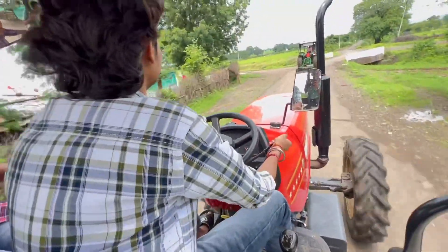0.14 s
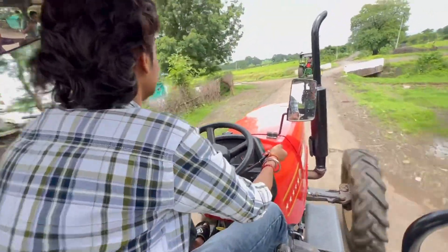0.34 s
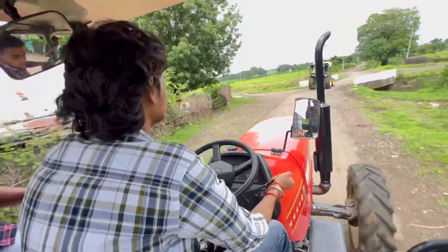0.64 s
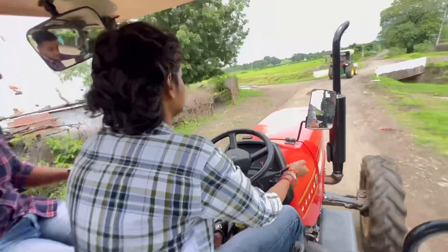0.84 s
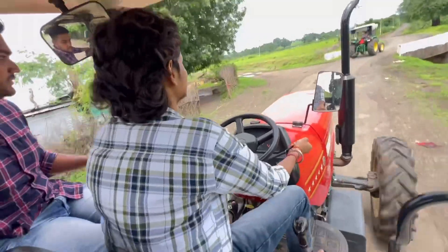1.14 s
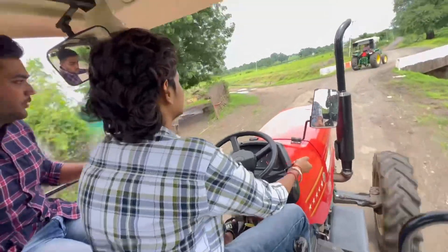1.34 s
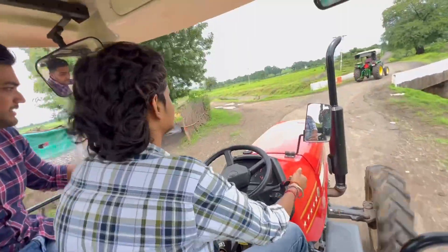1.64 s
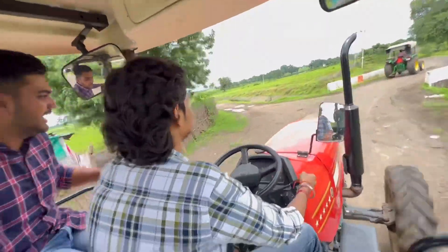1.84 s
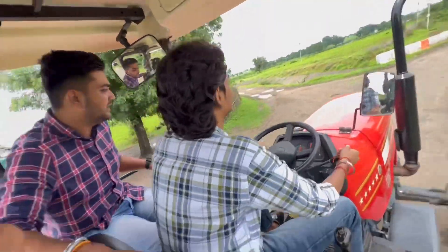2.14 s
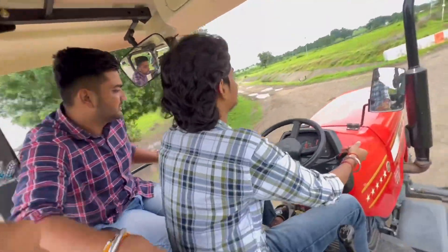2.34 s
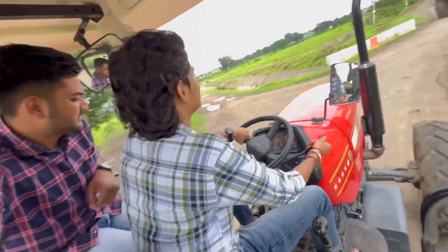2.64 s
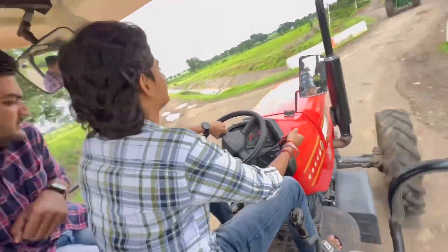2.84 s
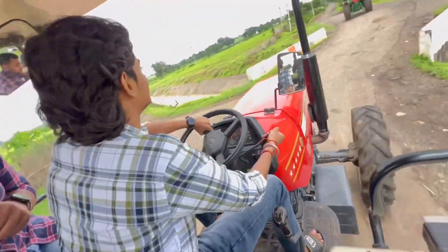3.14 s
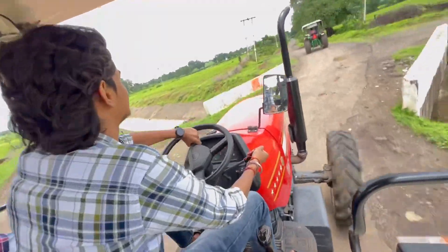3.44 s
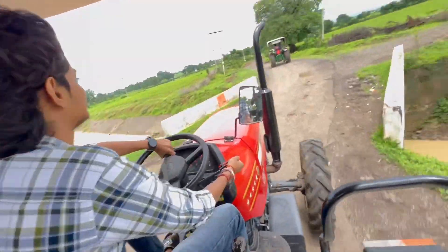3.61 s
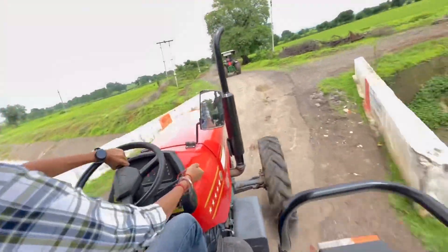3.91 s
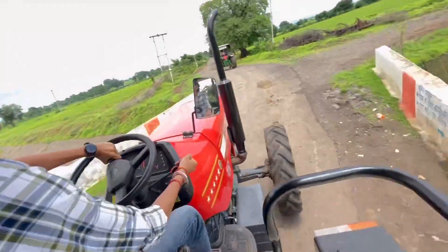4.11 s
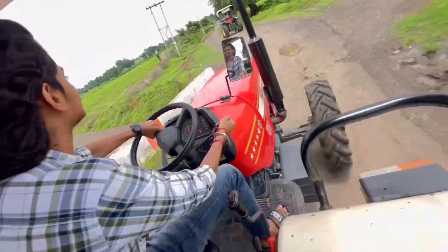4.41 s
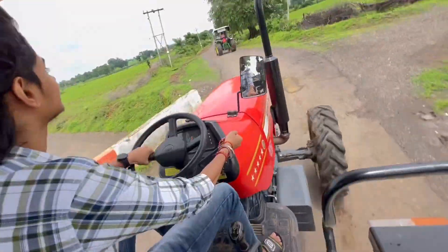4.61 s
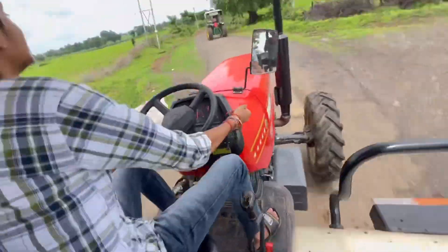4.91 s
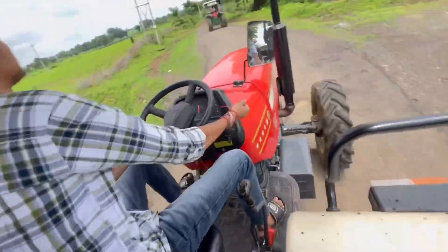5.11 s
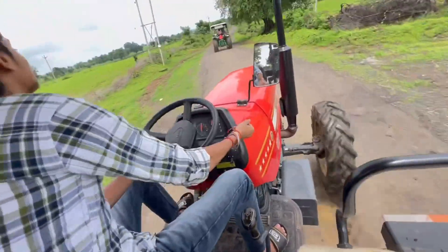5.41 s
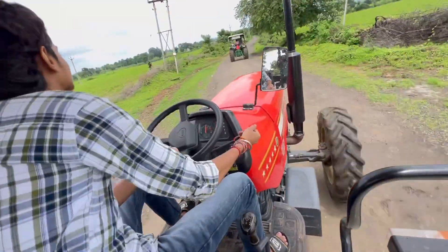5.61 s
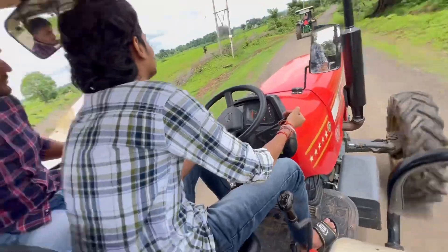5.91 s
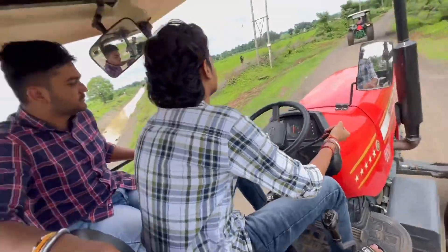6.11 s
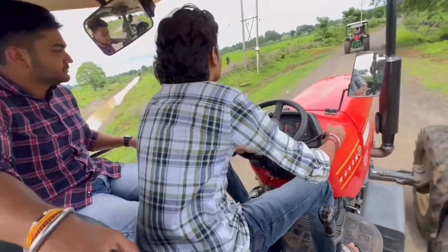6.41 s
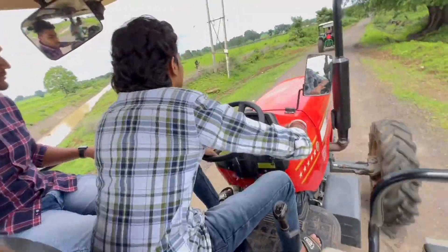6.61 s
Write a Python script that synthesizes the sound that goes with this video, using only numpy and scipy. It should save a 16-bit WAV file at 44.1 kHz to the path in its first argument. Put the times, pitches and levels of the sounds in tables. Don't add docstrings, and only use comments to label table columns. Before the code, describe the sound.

From the driver's platform of a moving tractor, a diesel engine clatters at nearly constant speed. It starts quieter, then a deep exhaust drone swells in within the first second and keeps surging and dropping. Bumps bring brief rattles and bright clinks, a faint pump whine comes and goes, and wind thumps the close stereo microphone outdoors.

```python
import sys
import numpy as np
from scipy import signal
from scipy.io import wavfile
from scipy.ndimage import uniform_filter1d

SR = 44100
rng = np.random.default_rng(int(sys.argv[2]) if len(sys.argv) > 2 else 0)


def volts(x):
    e = np.asarray(x, float) / 20
    return 10 ** e


def output_pcm(signal):
    pcm = np.clip(np.atleast_2d(signal).T, -1, 1) * 32767
    wavfile.write(sys.argv[1], SR, np.round(pcm).astype(np.int16))


N = 297675
TIME = np.arange(N) / SR

# (frequency [Hz], correlation [0-1])
PORT_LIKENESS = [(60, .8), (260, .65), (560, .15), (770, .45), (1050, .7), (1400, .3), (2500, .15),
                 (8800, .1), (9700, .985), (16000, .985)]
# (frequency [Hz], level difference [dB])
PORT_LEAN = [(60, 2.5), (200, 4.5), (700, 5), (1290, 3.2), (2380, .3), (3300, 3), (4000, 8), (5400, 8),
             (7200, 2), (9500, 0), (16000, 0)]
# (frequency [Hz], phase lead [rad])
PORT_LEAD = [(260, 0), (600, 3.1), (850, 5.3), (1500, 5.9), (1800, 9), (2500, 13.2), (9200, 11.3),
             (9750, 9.6), (10850, 9.25), (11250, 6.45), (12650, 6.1), (13250, 3.3), (14350, 3),
             (15150, .15), (16000, -.1)]

# (time [s], level [dB])
GUSTS = [(0, -44), (.4, -43), (.55, -38.5), (.88, -37), (1.18, -30.5), (1.55, -27.5), (1.85, -31),
         (2.1, -29), (2.38, -28), (2.48, -38.5), (3.05, -37.5), (3.53, -26.5), (3.7, -37), (4.8, -35.5),
         (5.4, -31), (5.95, -40), (6.55, -24.5), (6.75, -26.5)]
# (frequency [Hz], density [dB per Hz])
BUFFET_COLOUR = [(60, -25), (90, 2.5), (130, -2), (170, -3), (280, -4.5), (450, -6.5), (700, -14.5),
                 (1200, -62)]
# (frequency [Hz], density [dB per Hz])
THUD_COLOUR = [(22, -35), (33, -18), (42, 3), (60, 1.5), (95, 0), (130, 4.5), (200, -31)]

# (time [s], shaking level [dB])
SHAKING = [(0, -45), (.4, -45.5), (.75, -43.5), (1.3, -40.5), (2, -43), (2.6, -43), (3.3, -41),
           (3.9, -41.5), (4.23, -42), (4.4, -40), (4.68, -41), (5, -38.5), (5.64, -40), (5.86, -38),
           (6.15, -35), (6.75, -35)]
# (time [s], rattle rise [dB], dying time [s])
BUMPS = [(.69, 11, 0.065), (.85, 10, 0.12), (1.0, 8, .12), (1.3, -1.5, .08), (2.11, 8.5, 0.075),
         (2.35, 9, 0.16), (2.66, 7.5, 0.12), (2.91, 1, .05), (3.19, 5, 0.057), (3.4, 6.5, .08),
         (3.68, 8.5, 0.17), (4.29, 10, .04), (4.35, 3.5, .2), (4.74, 10, 0.17), (4.92, -2.5, 0.068),
         (5.16, 9.5, 0.11), (5.42, 5, .08), (5.75, 6.5, .1)]
# (time [s], peak level [dB], ring frequency [Hz])
CLINKS = [(0.6938, -33, 5680), (0.8984, -26, 6950), (0.9742, -32, 5334), (1.1494, -28, 4340),
          (2.1093, -30, 6050), (2.6296, -32, 5030), (3.6747, -31, 6150), (4.2856, -30, 4976),
          (4.7512, -32, 4510), (5.157, -33, 5920), (5.5351, -25, 5350), (5.62, -30, 4146),
          (5.7894, -30, 7460), (5.9386, -25, 7290), (6.09, -21.5, 8320), (6.2162, -21, 6330),
          (6.2921, -23, 6565)]
# (time [s], peak level [dB], ring frequency [Hz])
HARD_KNOCKS = [(0.694, -16, 1230), (0.825, -23, 1100), (1.186, -14.5, 910), (1.305, -16.5, 945),
               (1.487, -16.5, 910), (1.507, -24, 900), (2.285, -16.5, 866), (2.907, -17.5, 1046),
               (4.832, -24, 903), (5.016, -28, 890), (5.11, -18, 945), (5.19, -11.5, 1010),
               (5.365, -15, 1000), (5.41, -17, 1059), (5.47, -19, 950), (5.939, -20, 1015),
               (6.043, -31, 1006), (6.246, -12, 1040), (6.366, -11, 1062), (6.442, -11.5, 970),
               (6.465, -11, 1040), (6.614, -15, 980), (6.64, -11.5, 1036), (6.713, -12, 1058)]
# (frequency [Hz], density [dB per Hz])
RATTLE_COLOUR = [(6000, -5), (8500, -0.5), (9300, 0), (10300, 2), (12000, -11.5), (13800, -12),
                 (15300, -7.5), (17000, -4)]

# (frequency [Hz], level against knock [dB], wander [Hz])
GEAR_MESHES = [(543, -19.5, 3.4), (767, -16, 3.53), (910, -14, 3.45), (1080, -11.5, 10), (1222, -21, 7.96)]
# (start [s], length [s], pitch [Hz], glide [Hz per s], level [dB])
PUMP_WHINE = [
    (.75, .3, 2415, 150, -53),
    (1.3, .55, 2478, 0, -51),
    (1.85, .6, 2482, -25, -47),
    (1.45, 1.0, 4420, 0, -60),
    (3.2, .55, 2410, -30, -53),
]

# (time [s], firings per second [Hz])
FIRING_RATE = [(0.0, 40.7), (0.13, 41.1), (0.21, 39.67), (0.56, 39.2), (1.3, 39.9), (4.06, 40.16),
               (5.06, 39.25), (5.38, 39.88), (6.11, 39.85), (6.45, 40.83), (6.69, 40.7), (6.75, 39.9)]
# (time [s], level [dB])
LOAD = [(0, -40), (.4, -38), (.7, -33), (.9, -29.5), (1.4, -30), (2.1, -31.5), (2.5, -33.5), (2.75, -33),
        (3.1, -30.5), (3.55, -30), (4.23, -34), (4.4, -30.5), (4.68, -31.5), (5.17, -27.5), (5.47, -27),
        (5.64, -31), (6.17, -30), (6.26, -27)]
# (frequency [Hz], density [dB per Hz])
BLOCK_COLOUR = [(350, -15), (480, -11), (650, -10), (850, -4), (1100, -3.5), (1600, -5), (2000, -6.5),
                (2700, -13.5), (3400, -23), (4500, -46.5)]
# (frequency [Hz], width [Hz], level [dB])
PANELS = [(530, 9.6, 5), (741, 19, 1.5), (910, 22, -4), (980, 64, -2), (1063, 67, -4.5), (1244, 86, -5.5),
          (1484, 190, -9.5), (2580, 310, -6)]
# (frequency [Hz], density [dB per Hz])
HISS_COLOUR = [(1800, 0), (2800, 4.5), (3600, 1.5), (5000, -3), (6500, -0.5), (8500, -5.5), (9700, -16.5),
               (11000, -43)]

# (time [s], drone level [dB], third order over second [dB])
BOOM = [(0, -54, 6), (.46, -51, 3), (.72, -25, 2), (1.45, -22, -3), (1.86, -26.5, -3.5), (2.06, -35, 2),
        (2.14, -24.5, -1), (2.42, -25, -2), (2.48, -38, -2.5), (3.25, -22.5, -2), (3.46, -26.5, -2),
        (3.65, -38, 2), (4.0, -40, -5), (4.75, -33, -0.5), (5.15, -21.5, 5.5), (5.62, -35.5, -0.5),
        (6.3, -18, -2), (6.75, -26.5, 5)]
# (time [s], change [dB], half length [s])
DRONE_SURGES = [(1.2, -1.5, .03), (2.18, 2.5, 0.027), (2.33, -4, 0.023), (2.4, 4.5, .025), (3.3, -3, 0.027),
                (5.19, 4, .03), (2.56, -1.5, 0.063), (3.8, 9.5, .1), (4.36, 4.5, 0.058), (4.6, -1, .05),
                (5.25, -4.5, 0.035), (5.43, 2, 0.098), (5.97, 4.5, 0.11), (6.45, 1, 0.098)]
# (time [s], rise [dB], half length [s])
FLARES = [(.52, 22, 0.15), (.1, 10.5, 0.27), (1.26, 9, .06), (1.63, 11, 0.045), (1.74, 17, 0.087),
          (2.22, 14, .09), (3.36, 19.5, .05), (4.36, 19.5, .06), (5.06, 20, 0.041), (5.19, 12, .05),
          (5.88, 10, .05)]
# (time [s], rise [dB], half length [s])
GROWLS = [
    (1.28, 13, 0.085),
    (1.6, 9.5, 0.2),
    (2.05, 10.5, 0.35),
    (2.8, 6, 0.32),
    (3.2, 9, .15),
    (4.36, 12, .05),
    (5.1, 10, 0.11),
    (6.2, 12, .08),
    (6.4, 8, .1),
    (6.6, 7, .04),
]
# (multiple of firing rate, level against fifth [dB], phase [turns])
UPPER_ORDERS = [(1.001, -13, 0.11), (5, -2, 0.53), (6.42, -1.5, 0.3)]


def evened(x):
    return x / np.sqrt(np.mean(x ** 2) + 1e-20)


def read(points, hz):
    f, value = np.transpose(points)
    return np.interp(np.log(hz + 1), np.log(f + 1), value)


def curve(table, column=1):
    by_column = np.transpose(table)
    return np.interp(TIME, by_column[0], by_column[column])


def humps(events):
    return sum(db * np.exp(-((TIME - s) / half) ** 2) for s, db, half in events)


def drift(top_hz, count=24):
    hz = np.geomspace(top_hz / 12, top_hz, count)
    coarse = TIME[::64]
    cycles = hz[:, None] * coarse + rng.random((count, 1))
    waves = np.sin(2 * np.pi * cycles) / np.sqrt(hz)[:, None]
    return np.interp(TIME, coarse, evened(waves.sum(0)))


def field(colour, patchy_db, modes=(), modes_db=0, alike=1, size=2048):
    hop = size // 4
    frames, hz = N // hop + 5, np.fft.rfftfreq(size, 1 / SR)
    a, b, c, d, patches = rng.standard_normal((frames, len(hz), 5)).T
    patches = uniform_filter1d(patches, size=6, axis=0)
    patches = evened(uniform_filter1d(patches, size=8, axis=1))
    rings = 1 + sum(volts(2 * (db + modes_db)) / (1 + (2 * (hz - f) / w) ** 2) for f, w, db in modes)
    shape = volts(read(colour, hz)) * np.sqrt(rings)
    same = np.clip(alike * read(PORT_LIKENESS, hz), -1, 1)[:, None]
    left, unrelated = a + 1j * b, c + 1j * d
    delayed = left * np.exp(-1j * read(PORT_LEAD, hz))[:, None]
    right = same * delayed + np.sqrt(1 - same ** 2) * unrelated
    lean = volts(read(PORT_LEAN, hz) / 2)[:, None]
    z = np.array([left * lean, right / lean]) * shape[:, None] * volts(patchy_db * patches)
    pair = signal.istft(z, nperseg=size, noverlap=size - hop)[1][:, :N]
    return pair / np.sqrt(np.mean(pair.mean(0) ** 2))


def at_ports(hz, turns):
    lead, lean = read(PORT_LEAD, hz), volts(read(PORT_LEAN, hz) / 2)
    left = lean * np.sin(2 * np.pi * turns)
    right = np.sin(2 * np.pi * turns - lead) / lean
    return np.sqrt(2) * np.array([left, right])


def wind():
    gust_db, boom_db = curve(GUSTS), curve(BOOM)
    swell_db = boom_db - boom_db.mean() + gust_db - gust_db.mean()
    thud_db = -43 + 0.18 * swell_db + 1.4 * drift(9)
    buffet = field(BUFFET_COLOUR, patchy_db=1.47, alike=0.72)
    thud = field(THUD_COLOUR, patchy_db=2.5, alike=0.45, size=4096)
    return volts(gust_db + 1.5 + 0.67 * drift(25)) * buffet + volts(thud_db + 4.5) * thud


def gears():
    load_db, out = curve(LOAD), np.zeros((2, N))
    for hz, db, wander in GEAR_MESHES:
        turns = np.cumsum(hz + wander * drift(6)) / SR
        out += volts(load_db + db + 1.8 * drift(12)) * at_ports(hz, turns)
    return out


def steering_pump():
    out = np.zeros((2, N))
    for s, length, start_hz, glide, db in PUMP_WHINE:
        hz = start_hz + glide * np.clip(TIME - s, 0, length) + 4 * drift(5)
        sounding = uniform_filter1d(1. * (TIME > s) * (TIME < s + length), size=4000)
        out += volts(db + 0.99 * drift(6)) * sounding * at_ports(hz, np.cumsum(hz) / SR)
    return out


def blows(events, t60, level_db):
    t = np.arange(3000) / SR
    rings, envelope = np.zeros((2, N + len(t))), np.zeros(N + len(t))
    for s, db, hz in events:
        onset = np.minimum(t / 0.00064, 1)
        fade = volts(db + level_db - 60 * t / t60) * onset
        at = round(s * SR)
        rings[:, at:at + len(t)] += fade * at_ports(hz, hz * t)
        envelope[at:at + len(t)] += fade
    return rings[:, :N], envelope[:N]


def jolts():
    clinks, bright = blows(CLINKS, t60=0.053, level_db=-3.5)
    knocks, _ = blows(HARD_KNOCKS, t60=0.041, level_db=-4.5)
    burst = bright * field(RATTLE_COLOUR, patchy_db=1.5, alike=0.6, size=256)
    return 0.45 * clinks + knocks + 0.5 * burst


def bump_rise():
    rise_s = 0.027
    return sum(db * np.exp(np.minimum((TIME - s) / rise_s, (s - TIME) / dying)) for s, db, dying in BUMPS)


def firing_gate(turns, late, fade, steady, uneven_db):
    turns = turns - late + 1
    each_firing = volts(uneven_db * np.clip(rng.standard_normal(400), -2, 1.6))
    hardness = each_firing[turns.astype(int)]
    burst = uniform_filter1d(hardness * np.exp(-(turns % 1) / fade), size=90)
    return evened(steady + burst)


def loose_parts(turns):
    rattle_db = -60.5 + 1.93 * (curve(SHAKING) + 43.0) + bump_rise()
    puffs = firing_gate(turns, late=0.25, fade=0.4, steady=0.35, uneven_db=3.5)
    return volts(rattle_db + 9.0) * puffs * field(RATTLE_COLOUR, patchy_db=0.5, size=512)


def valves_and_fan(turns):
    hiss_db = curve(SHAKING) + 0.39 * bump_rise()
    pulses = firing_gate(turns, late=0.34, fade=0.51, steady=2.5, uneven_db=2.0)
    return volts(hiss_db + 0.5) * pulses * field(HISS_COLOUR, patchy_db=1.6, size=512)


def block_knock(turns):
    knock_db = curve(LOAD) + 0.11 * bump_rise() + 0.65 * drift(14)
    strokes = firing_gate(turns, late=0.5, fade=0.45, steady=1.5, uneven_db=2.5)
    ringing = field(BLOCK_COLOUR, patchy_db=2.2, modes=PANELS, modes_db=6, size=4096)
    return volts(knock_db + 0.5) * strokes * ringing


def exhaust(turns):
    boom_db, tilt_db, gust_db = curve(BOOM) + humps(DRONE_SURGES), curve(BOOM, 2), curve(GUSTS)
    fourth_db = gust_db - 12.5 + humps(FLARES) + 1.5 * drift(12)
    fifth_db = gust_db - 11 + humps(GROWLS) + 1.5 * drift(12)
    turns = turns + 0.012 * drift(16) + 0.018 * drift(11) * np.array([[1], [-1]])

    def order(multiple, db, phase):
        return volts(db) * np.cos(2 * np.pi * (multiple * turns + phase))

    tone = order(2, boom_db - tilt_db / 2 + 1.4 * drift(22), 0.054 * drift(12))
    tone += order(3, boom_db + tilt_db / 2 + 1.0 * drift(20), 0.16 + 0.035 * drift(9))
    tone += order(4, fourth_db - 4.0, 0.33 + 0.037 * drift(8))
    for multiple, db, phase in UPPER_ORDERS:
        tone += order(multiple, fifth_db + db - 2.0 + 1.8 * drift(10), phase + 0.056 * drift(6.6))
    return np.sqrt(2) * tone * volts([[1.4], [-1.4]])


def scene():
    turns = np.cumsum(curve(FIRING_RATE)) / SR
    surroundings = wind() + gears() + steering_pump() + jolts()
    engine = loose_parts(turns) + valves_and_fan(turns) + block_knock(turns)
    return surroundings + engine + exhaust(turns)


def low_pass(x):
    return signal.sosfilt(signal.butter(12, 15800, fs=SR, output="sos"), x)


def record(dry):
    low_cut = signal.butter(2, 30, "high", fs=SR, output="sos")
    mix = signal.sosfilt(low_cut, dry)
    return low_pass(mix)


dry = scene()
out = record(dry)
output_pcm(out)
```